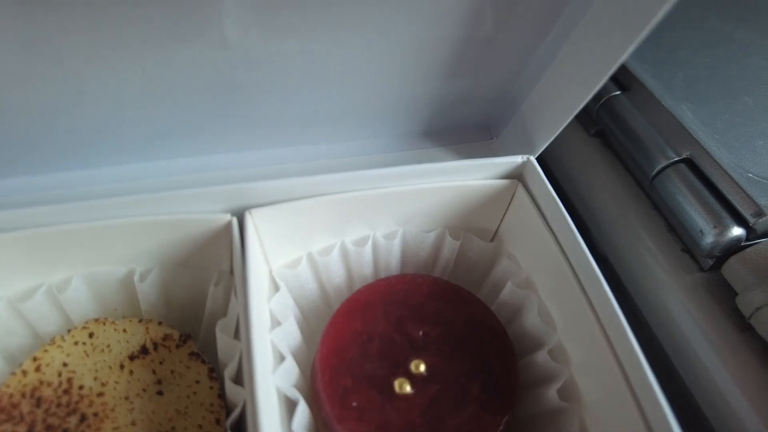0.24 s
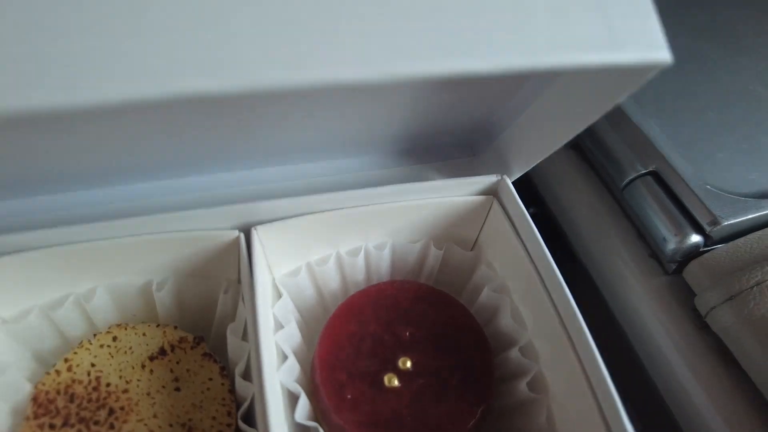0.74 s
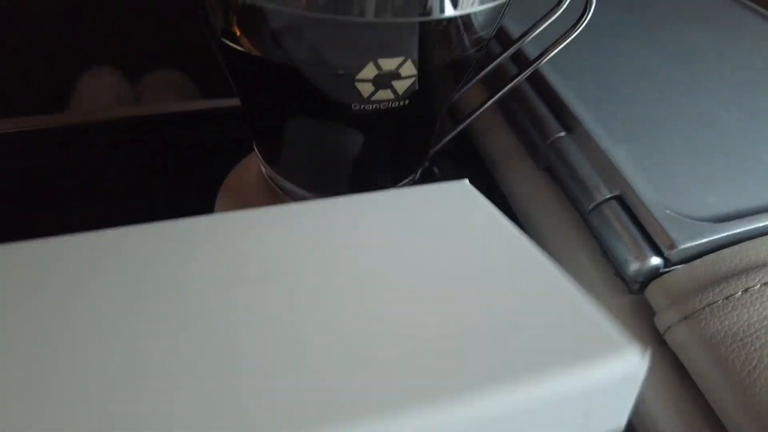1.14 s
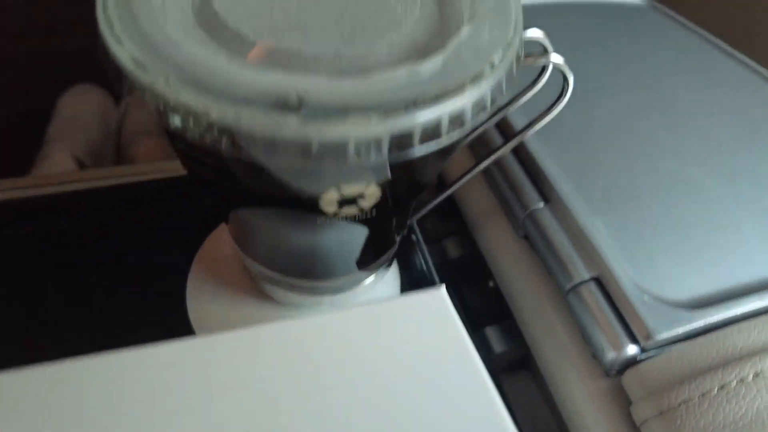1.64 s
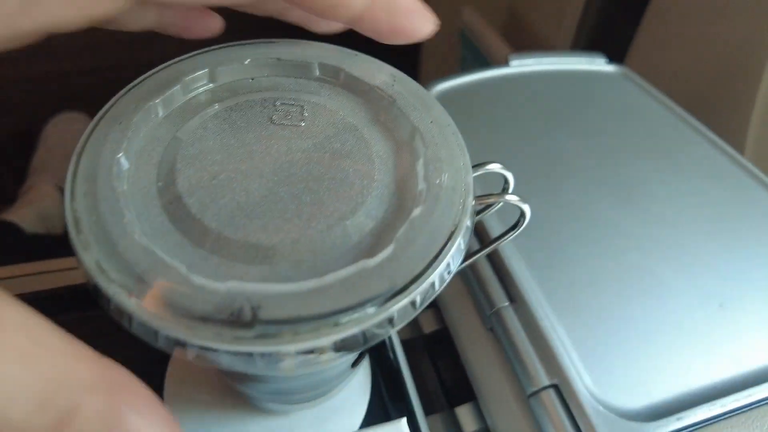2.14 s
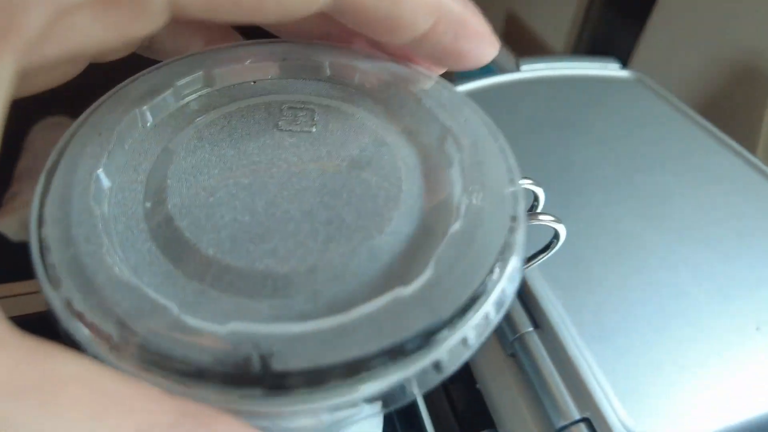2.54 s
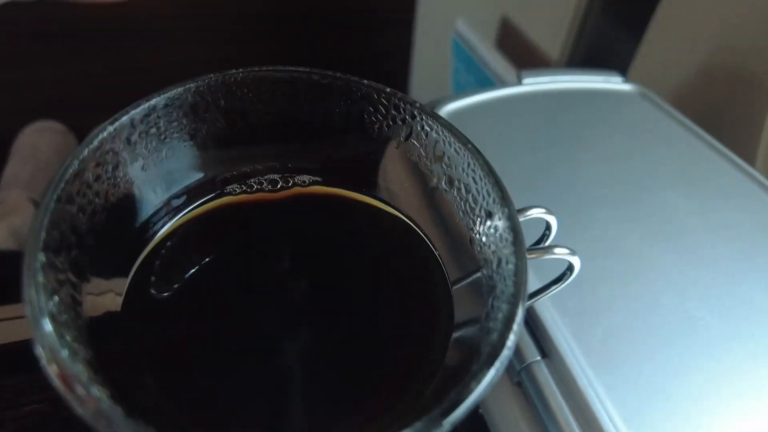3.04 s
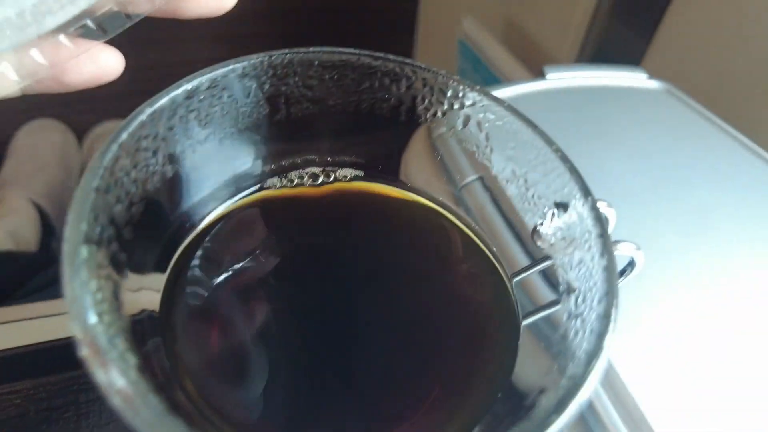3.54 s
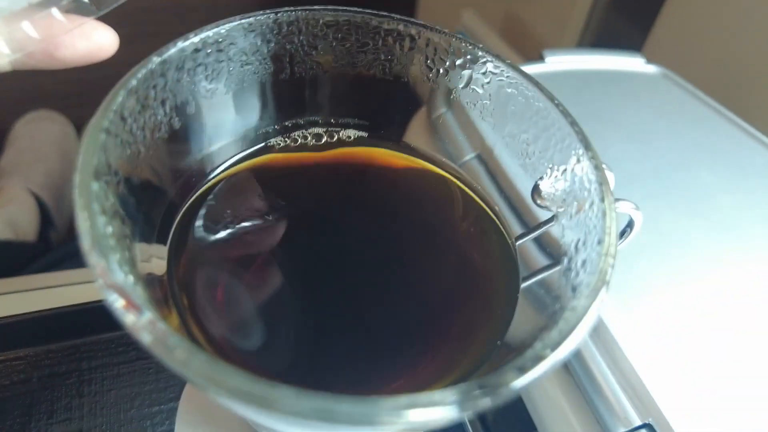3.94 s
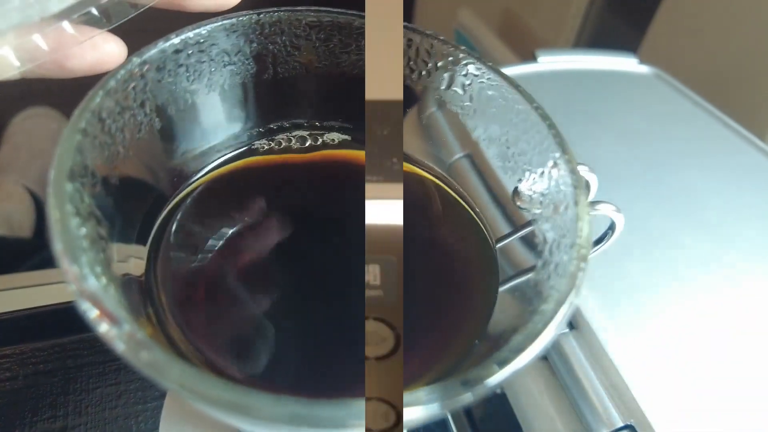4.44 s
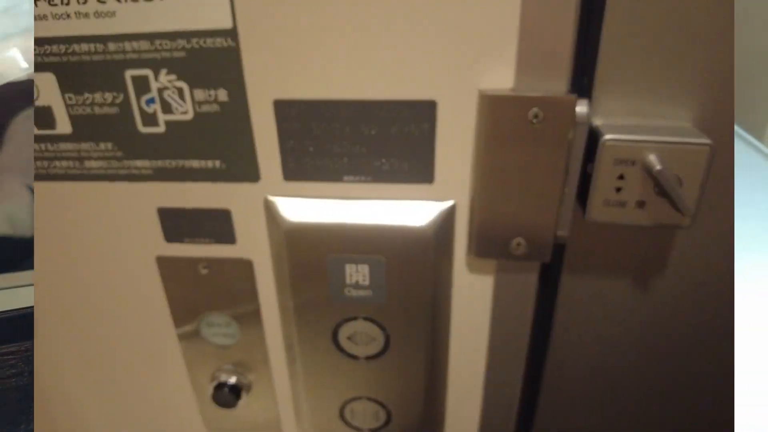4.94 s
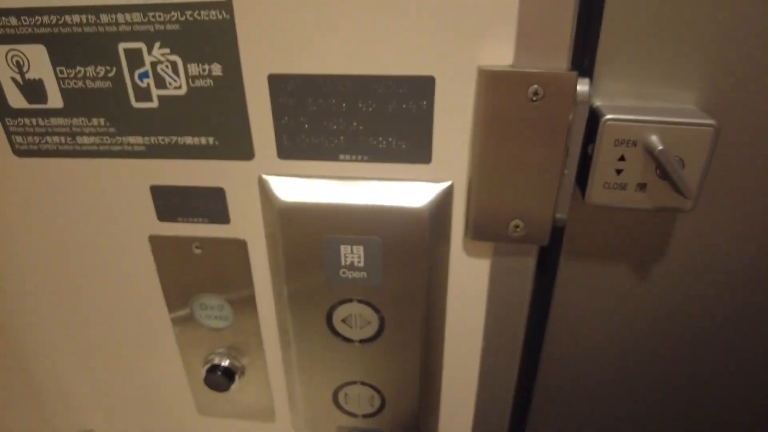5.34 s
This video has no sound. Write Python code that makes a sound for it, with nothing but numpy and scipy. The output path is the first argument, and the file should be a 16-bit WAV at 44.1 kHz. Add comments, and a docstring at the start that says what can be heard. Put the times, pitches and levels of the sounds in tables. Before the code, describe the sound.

Inside a smoothly running fast train, a deep bass-heavy rumble holds steady, with a wavering low boom, a slightly higher drone slowly building, soft rushing air and a barely audible thin vent whistle. Close to the microphone, at about 0.15 and 0.24 s, a card box gives small papery knocks, with a soft rub near 0.5 s. From 1.04 to 1.54 s its lid closes, a faint breathy hollow falling in pitch, ending in a tiny tap. The rumble eases slightly until 2.7 s. Fingers rustle; at 2.19 s they grip the cup with a dull hollow knock, and small crackles follow to 2.7 s. Plastic clicks lightly on glass around 3.67, 4.18 and, more crisply, 4.62 s. The rumble sinks, then at 4.76 s cuts abruptly to a louder vestibule: heavy roar growing for half a second, rolling floor booms, machinery hum, hissing air and faint whine, continuing to the end.

```python
"""A fast train from inside: shaped noise for wheel rumble and rushing air, wavering tones for body booms.
At the seat a card cake box is closed and the plastic lid is lifted off a glass of coffee: noise bursts
for taps and bumps, decaying modes for knocks, filtered noise for rubs, puffs and rustle, ringing hollows.
Then, abruptly, the vestibule by a door: louder running noise with machinery hum and bands of whine."""
import sys
import numpy as np
from scipy import signal
from scipy.fft import rfft, irfft, next_fast_len
from scipy.io import wavfile
from scipy.ndimage import uniform_filter1d, minimum_filter1d

SR = 44100
rng = np.random.default_rng(int(sys.argv[2]) if len(sys.argv) > 2 else 0)


def to_wav(s):
    """Save 16-bit WAV."""
    ch = np.atleast_2d(s).T  # columns
    pcm = np.round(np.clip(ch, -1, 1) * 32767)  # PCM
    wavfile.write(sys.argv[1], SR, pcm.astype(np.int16))


N = 247401

TIME = np.arange(N) / SR  # s
SIZE = next_fast_len(N, real=True)
HZ = np.maximum(np.fft.rfftfreq(SIZE, 1 / SR), 1)
BURST = np.arange(SR // 4) / SR  # time within one blow, s
BURST_HZ = np.maximum(np.fft.rfftfreq(len(BURST), 1 / SR), 1)
SIDES = np.array([[1], [-1]])  # left, right

# Running noise at the seat, low and high part: (frequency [Hz], level per Hz [dB])
SEAT_RUMBLE_SHAPE = [(8.8, -44.5), (15, -11), (27, 0.5), (43, -7), (54, -3.5), (70, -7), (97, -10.5),
                     (125, -11), (158, -14), (179, -27.5), (237, -23), (331, -32), (420, -40), (550, -68.5),
                     (920, -120)]
SEAT_AIR_SHAPE = [(250, -23.5), (380, -1.5), (460, 0), (540, 0.5), (660, -6), (780, -10), (920, -10),
                  (1160, -16.5), (1300, -10), (1550, -16), (1850, -20), (2400, -27.5), (2850, -28),
                  (7000, -48.5)]
# Running noise in the vestibule, low and high part: (frequency [Hz], level per Hz [dB])
DOOR_RUMBLE_SHAPE = [(8.8, -40.5), (15, -0.5), (38, -6), (60, 0.5), (75, -5), (89, -6.5), (118, -13),
                     (185, -14.5), (201, -15.5), (227, -24), (309, -21), (420, -40.5), (550, -47.5),
                     (920, -120)]
DOOR_AIR_SHAPE = [(250, -33), (380, -3), (490, -5), (680, -10), (830, -9.5), (1030, -18), (1330, -16.5),
                  (2050, -23.5), (2460, -30), (3500, -32), (4200, -41), (5000, -48), (7500, -57),
                  (11500, -74.5)]
# Stereo width, side against mid: (frequency [Hz], level [dB])
SEAT_WIDTH = [(25, -31), (75, -31.5), (130, -19), (250, -9), (450, -5.5), (800, 4), (1050, 5.5),
              (1500, -10), (3000, 1.5), (12000, 4)]
DOOR_WIDTH = [(25, -19.5), (70, -36), (120, -25.5), (190, -11.5), (330, -6), (600, -3), (900, 6),
              (1400, -8.5), (3000, 2), (9000, 4)]
# Stereo balance, left minus right: (frequency [Hz], level [dB])
SEAT_LEAN = [(60, -2), (96, 0), (150, 0.5), (240, 1), (390, 1), (620, 1.5), (990, 3), (1580, -0.5),
             (2520, 0), (4020, -1)]
DOOR_LEAN = [(60, -2), (96, 0.5), (150, -1), (240, 2), (390, -0.5), (620, 2.5), (990, 2.5), (1580, -0.5),
             (2520, 1), (4020, -0.5)]
# Wavering drones of the cabin panels: (frequency [Hz], starting level [dB])
PANEL_DRONES = [(242, -44.5), (302, -51)]
# Swells of the vent whistle: (start [s], length [s], added level [dB])
WHISTLE_SWELLS = [(0.335, 0.21, -66), (0.92, 0.23, -66.5), (2.018, 0.34, -71), (3.546, 1, -71)]
# Machinery hum in the vestibule: (frequency [Hz], level [dB])
HUM_LINES = [(172, -41), (193, -38), (275, -45.5), (312, -46), (361, -43.5), (408, -52.5), (458, -48),
             (531, -54.5), (576, -52.5), (626, -56), (690, -57.5), (796, -54.5), (945, -61.5), (1368, -64),
             (1535, -65), (1976, -60), (2915, -65), (2937, -64.5), (3036, -65.5), (3061, -63),
             (3105, -62.5), (3801, -73)]
# Narrow bands of whine in the vestibule: (centre [Hz], width [Hz], level [dB])
WHINE_BANDS = [(2990, 300, -51.5), (3950, 340, -60), (5980, 590, -72.5), (9250, 420, -86),
               (10600, 120, -86)]
# Surges of the floor boom in the vestibule: (start [s], length [s], level [dB])
FLOOR_SURGES = [(4.789, 0.088, -17.5), (4.925, 0.11, -17.5), (5.028, 0.077, -12), (5.125, 0.058, -11),
                (5.246, 0.19, -16), (5.567, 0.084, -18.5)]
# Taps and creases of card and plastic:
# (time [s], starting level [dB], centre [Hz], 60 dB decay [s], treble level [dB])
TAP_EVENTS = [(0.153, -54, 2400, 0.12, -42), (0.237, -57, 3000, 0.14, -25), (0.538, -64, 3500, 0.12, -22.5),
              (.66, -65, 4500, .07, -8), (.745, -71, 4500, .07, -18), (.919, -60.5, 6930, 0.046, 11),
              (1.357, -65, 9000, 0.15, -3), (1.515, -45.5, 2800, 0.01, 6), (1.641, -61.5, 4590, 0.21, -7),
              (2.074, -54.5, 3030, 0.11, -19), (2.125, -63, 3800, 0.11, -11),
              (2.192, -61.5, 2900, 0.19, -29), (2.333, -68, 7000, .07, -10), (2.413, -56, 4000, 0.026, -33),
              (2.415, -65, 6900, .025, -30), (2.588, -59.5, 7000, 0.14, -24), (2.593, -53, 1970, 0.1, -25),
              (2.621, -61, 2100, 0.045, -17), (2.687, -57, 1590, 0.1, -35), (3.082, -63, 3000, .046, -23),
              (3.257, -66.5, 10900, 0.32, -8), (3.478, -59.5, 1900, 0.2, -14),
              (3.735, -67, 6500, 0.049, -20), (4.352, -59, 4050, 0.023, -5.5),
              (4.483, -62, 4000, 0.014, -19), (4.596, -61, 4500, .01, -10), (4.616, -54, 5000, 0.025, -24),
              (4.625, -62, 9000, .02, -3), (4.636, -47, 7500, 0.012, 5), (4.641, -60, 9000, .01, 5),
              (4.659, -50.5, 3700, 0.011, -12), (4.707, -60.5, 13000, 0.044, -16)]
# Dull bumps on the box and the tray table: (time [s], starting level [dB], centre [Hz], 60 dB decay [s])
BUMP_EVENTS = [(.238, -45.5, 400, 0.22), (1.514, -47, 1250, 0.027), (2.076, -55, 750, .06),
               (2.187, -44, 420, 0.22), (2.192, -54, 1200, .15), (2.48, -52, 850, 0.086),
               (3.675, -47, 560, 0.18), (4.636, -49.5, 1000, 0.027)]
# The plastic lid knocks on the glass: (time [s], level [dB])
LID_KNOCKS = [(3.661, -50.5), (3.682, -53), (4.104, -56), (4.179, -43.5), (4.312, -53.5), (4.617, -42)]
# Ringing modes of lid on glass: (frequency [Hz], level [dB], 60 dB decay [s])
LID_RING = [(1070, -6.5, 0.15), (1830, 0.5, 0.036), (1900, -10.5, 0.028), (2700, -18.5, 0.039),
            (3200, -19.5, 0.05), (4400, -15.5, 0.034), (5300, -14.5, 0.014)]
# The fingers take hold of the cup: (time [s], level [dB])
CUP_GRASPS = [(2.187, -36.5), (2.193, -50)]
# Ringing modes of the cup on its tray: (frequency [Hz], level [dB], 60 dB decay [s])
CUP_RING = [(314, 0, 0.11), (388, 6.5, 0.07), (586, -7, 0.11), (710, -12, 0.048), (870, -11, 0.21),
            (1370, -14, 0.12)]
# The card box is knocked as its lid is taken hold of: (time [s], starting level [dB], 60 dB decay [s])
BOX_HITS = [(.153, -49.5, .05), (0.159, -48, 0.13), (0.241, -47.5, 0.11)]
# Resonances of the card walls: (centre [Hz], width [Hz], level [dB])
CARD_WALLS = [(860, 120, 6), (1020, 90, 12), (1250, 200, -2), (1520, 160, 2), (1990, 150, -11),
              (2450, 180, -21), (3160, 260, -21)]
# Soft rubs and puffs of air around the box, lid and cup: (start [s], length [s], level [dB], centre [Hz])
RUBS_AND_PUFFS = [(0, 0.1, -51, 730), (0, .1, -49, 415), (0.502, 0.073, -44, 494), (0.542, 0.19, -53, 660),
                  (0.72, 0.15, -68, 1700), (1.06, 0.28, -68.5, 1900), (1.11, 0.25, -70.5, 2880),
                  (2.597, 0.14, -69.5, 6100), (3.456, .11, -50.5, 700), (3.626, 0.096, -51, 530),
                  (3.973, 0.19, -53, 560)]
# Edges of card or plastic scrape: (start [s], length [s], level [dB], centre [Hz], width [Hz])
EDGE_SCRAPES = [(0.144, 0.021, -58, 2600, 2200), (0.233, 0.02, -60, 4770, 5000),
                (2.573, .045, -64, 5800, 2000), (2.652, 0.044, -70, 5760, 2220)]
# The hand covers the cup and its air rings: (start [s], length [s], level [dB], note [Hz])
CUPPED_AIR = [(1.75, 0.56, -63, 928), (2.37, 0.26, -57, 980), (2.66, 0.18, -58, 870),
              (2.782, 0.2, -62, 950), (3.08, 1.05, -60, 980), (3.841, 0.48, -59.5, 919)]
# Fingertips stroke card or plastic: (start [s], length [s], level [dB])
FINGER_STROKES = [(0, 0.28, -74), (0.218, 0.24, -73.5), (0.58, 0.23, -75), (0.89, 0.095, -71),
                  (1.02, 0.35, -69.5), (1.404, 0.19, -67.5), (1.616, 0.31, -73.5), (1.926, 0.31, -69),
                  (2.317, 0.19, -75.5), (2.885, 0.11, -70.5), (3.03, .12, -73.5), (3.21, 0.22, -75),
                  (3.446, 0.2, -74.5), (3.672, 0.14, -76.5), (3.925, 0.075, -78), (4.342, 0.14, -83.5),
                  (4.6, 0.089, -73)]
# Colour of the fingertip hiss and the faint hiss under it: (frequency [Hz], level [dB])
RUSTLE_SHAPE = [(700, -21.0), (1800, 0), (4700, -0.5), (6500, -4.0),
                (8000, -3.5), (11500, -14), (13400, -7.0), (15500, -7.0)]

LEAVE_S, ARRIVE_S = 4.751, 4.761  # end of the seat, start of the vestibule
SEAT_RUMBLE_DB, SEAT_AIR_DB = -24, -54
LOW_BOOM_DB = -26.5
UPPER_BOOM_DB, UPPER_BOOM_RISE_DB, UPPER_BOOM_RISE_S = -32, 5.5, 4.6  # builds up to its level
PANEL_FADE_DB_PER_S = 1.95  # the drones slowly die down
VENT_DB, VENT_RUSH_DB = -72.5, -16.5  # steady whistle, and its noise against the pure note
LULL_S, LULL_LENGTH_S, LULL_DB = 1.07, 1.64, -1.26  # the track runs smoother for a moment
SINK_S, SINK_DB_PER_S = 4.525, 23.5  # the running noise sinks just before the seat is left
DOOR_RUMBLE_DB, DOOR_AIR_DB = -15, -38  # full level in the vestibule
DOOR_RISE_DB, DOOR_RISE_S = 4.5, 0.54  # the noise there grows at first, then holds
BOX_START_S, BOX_CLOSE_S, BOX_DB = 1.04, 0.5, -55.5  # the box lid comes down and the air inside rings
BOX_OPEN_HZ, BOX_SHUT_HZ, BOX_GLIDE_POWER = 1383, 585, 1.25  # falls ever faster as the gap closes
BOX_PUFF_S, BOX_PUFF_LENGTH_S, BOX_PUFF_DB = 1.235, 0.086, 2.5  # a brief stronger puff of squeezed air
BOX_UPPER_RATIO, BOX_UPPER_DB, BOX_UPPER_SHARE = 1.27, -61, 0.72  # second resonance, ends early
STROKE_RISE, STROKE_FALL = 0.17, 0.35  # shares of a movement spent speeding up and slowing down
HISS_FLOOR_DB = -74.5  # constant faint high hiss of the cabin air under the strokes
CRINKLES_PER_S, CRINKLE_DB, CRINKLE_SPREAD_DB = 14, 3.5, 5  # tiny creases, against the hiss
CRINKLE_HZ, CRINKLE_S = 8000, 0.0021  # their centre and decay time
SLIPS_PER_S = 1300  # how often a scraping edge slips
CEILING_DB, LIMIT_S = -3.7, 0.03  # limiter ceiling and smoothing time
TOP_HZ = 15800


def undb(db):
    """Decibels to gain."""
    return np.exp(np.asarray(db) * (np.log(10) / 20))


def unit(x):
    """Scale to rms 1."""
    return x / np.sqrt(np.mean(x ** 2))


def spectrum(points):
    """Gain at every frequency, drawn through (frequency [Hz], level [dB]) points."""
    hz, db = np.transpose(points)
    return undb(np.interp(np.log(HZ), np.log(hz), db))


def resonance(hz, width_hz, at=HZ):
    """Response of a damped resonator, gain 1 at its centre."""
    return 1 / (1 + 1j * (at ** 2 - hz ** 2) / (at * width_hz))


def colour(x, response):
    """Filter by a frequency response."""
    return irfft(rfft(x, SIZE) * response, SIZE)[..., :N]


def walk(rate):
    """Smooth random drift of spread about 1, changing about rate times a second."""
    knots = rng.standard_normal(N // 16)
    return 1.248 * np.interp(2 * rate * TIME, np.arange(len(knots)), knots)


def near_noise(width):
    """Noise from close by: partly alike at both ears."""
    mid, apart = rng.standard_normal((2, N))
    return mid + width * SIDES * apart


def stereo_noise(shape, side, balance):
    """Coloured noise in stereo, with a mid of rms 1."""
    mid, apart = rng.standard_normal((2, N))
    pair = mid + SIDES * colour(apart, spectrum(side))
    pair = colour(pair, shape * spectrum(balance) ** (SIDES / 2))
    return pair / np.std(pair.mean(axis=0))


def steady(x, window_s, share):
    """Even out a share of the slow swells of a noise."""
    power = uniform_filter1d(x.mean(axis=0) ** 2, int(window_s * SR))
    return x / (power + 1e-9) ** (share / 2)


def waver(x, lowest_hz, depth_db):
    """Turbulence: each of eight half-octave bands swells and sinks on its own."""
    bands = np.eye(8)  # each row opens one band
    centres = np.log(lowest_hz) + np.arange(len(bands)) * np.log(2) / 2
    whole, log_hz = rfft(x, SIZE), np.log(HZ)
    out = 0
    for band in bands:
        part = irfft(whole * np.interp(log_hz, centres, band), SIZE)[:, :N]
        out = out + part * undb(depth_db * walk(rate=6))
    return out


def tone(hz, wander_hz, rate, flutter_db):
    """A sine of rms 1 that wavers in pitch and level."""
    phase = 2 * np.pi * np.cumsum(hz + wander_hz * walk(rate)) / SR
    sine = np.sin(phase + rng.uniform(0, 2 * np.pi))
    return unit(sine * undb(flutter_db * walk(rate)))


def stroke(s, length):
    """A smooth movement from 0 to 1 and back: it speeds up, holds and slows to rest."""
    done = (TIME - s) / length
    return np.clip(np.minimum(done / STROKE_RISE, (1 - done) / STROKE_FALL), 0, 1)


def build_up(s, rise_s, rise_db):
    """A level in dB that climbs evenly to 0 and stays there."""
    return -rise_db * np.clip(1 - (TIME - s) / rise_s, 0, 1)


def fade(t60):
    """A quick rise, then exponential decay; longer sounds begin more softly."""
    age = BURST / t60
    return (1 - np.exp(-age / 0.003)) * np.exp(-np.log(1000) * age)


def burst(shape, t60, crackle_db):
    """The crackle of one contact, rung through a response; about rms 1 at its start."""
    size = len(BURST)
    mid, apart = rng.standard_normal((2, size))
    # the level jumps every 32 samples
    crackle = undb(crackle_db * np.repeat(rng.standard_normal(size), 32)[:size])
    push = (mid + 0.6 * SIDES * apart) * crackle * fade(t60)
    return irfft(rfft(push) * shape, size) / np.sqrt(np.mean(abs(shape) ** 2))


def ringing(modes):
    """One blow on an object: its modes sound together, each decaying at its own pace."""
    return sum(np.sin(2 * np.pi * hz * BURST) * fade(t60) * undb(db) for hz, db, t60 in modes)


def add(out, s, sound):
    """Mix a short sound in at a given time."""
    start = int(s * SR)
    out[:, start:start + len(BURST)] += sound


def crinkles():
    """Tiny creases snap at random moments, a few much stronger than the rest."""
    strengths = undb(CRINKLE_SPREAD_DB * rng.standard_normal(N))
    snaps = (rng.random(N) < CRINKLES_PER_S / SR) * strengths
    dying = signal.lfilter([1], [1, -np.exp(-1 / (CRINKLE_S * SR))], snaps)
    crackle = unit(colour(near_noise(width=0.67), resonance(CRINKLE_HZ, CRINKLE_HZ)))
    return crackle * dying * undb(CRINKLE_DB)


def rustle():
    """Skin slips over card and plastic in a grainy, catching hiss, above a faint hiss of the cabin air."""
    strokes = sum(stroke(s, length) * undb(db) for s, length, db in FINGER_STROKES)
    catches = undb(2 * walk(14))
    grains = near_noise(width=0.8) * undb(1.5 * walk(250))
    hiss = unit(colour(grains, spectrum(RUSTLE_SHAPE)) * catches)
    return (hiss + crinkles()) * (undb(HISS_FLOOR_DB) + strokes)


def rubs():
    """Soft rubs and puffs of air: filtered noise that starts quickly and dies away."""
    noise = near_noise(width=0.6) * undb(1.5 * walk(120))
    out = 0
    for s, length, db, hz in RUBS_AND_PUFFS:
        swell = np.interp((TIME - s) / length, [0, 0.08, 0.7, 1], [0, 1, 0.7, 0])
        band = unit(colour(noise, resonance(hz, hz * 0.36) ** 2))
        out = out + band * swell * undb(db)
    return out


def scrapes():
    """An edge sticks and slips in a dense run of tiny snaps that ring the card or plastic."""
    slips = rng.random(N) < SLIPS_PER_S / SR
    chatter = slips * near_noise(width=1.0)
    out = 0
    for s, length, db, hz, width in EDGE_SCRAPES:
        edge = unit(colour(chatter, resonance(hz, width) ** 2))
        out = out + edge * stroke(s, length) * undb(db)
    return out


def cavity(hz, width_hz):
    """A half-shut hollow rings with noise: a narrow band centred on the given note."""
    ring = colour(near_noise(width=0.91), 1 / (1 + (HZ / width_hz) ** 2))
    carrier = np.cos(2 * np.pi * np.cumsum(hz * np.ones(N)) / SR)
    return unit(ring * carrier * undb(2 * walk(25)))


def hollows():
    """The air in the box falls in pitch as its lid closes; the cup rings whenever the hand covers it."""
    closed = np.clip((TIME - BOX_START_S) / BOX_CLOSE_S, 0, 1)
    note = BOX_OPEN_HZ + (BOX_SHUT_HZ - BOX_OPEN_HZ) * closed ** BOX_GLIDE_POWER
    puff = undb(BOX_PUFF_DB * stroke(BOX_PUFF_S, BOX_PUFF_LENGTH_S))
    outflow = stroke(BOX_START_S, BOX_CLOSE_S) * puff
    lower = cavity(note, width_hz=120) * outflow * undb(BOX_DB)
    early_flow = stroke(BOX_START_S, BOX_CLOSE_S * BOX_UPPER_SHARE)
    upper = cavity(note * BOX_UPPER_RATIO, width_hz=170) * early_flow * undb(BOX_UPPER_DB)
    cup = sum(cavity(hz, width_hz=77) * stroke(s, length) * undb(db) for s, length, db, hz in CUPPED_AIR)
    return lower + upper + cup


def taps():
    """Each tap is a burst of crackle in one broad resonance, with a crisp top."""
    out = np.zeros((2, N))
    crisp = resonance(11000, 11000, BURST_HZ)
    for s, db, hz, t60, treble_db in TAP_EVENTS:
        # a yielding contact dulls what lies far above the resonance
        soft = 1 / (1 + (BURST_HZ / (8.6 * hz)) ** 2)
        shape = resonance(hz, hz * 0.33, BURST_HZ) * soft + undb(treble_db) * crisp
        add(out, s, burst(shape, t60, crackle_db=1.5) * undb(db))
    return out


def bumps():
    """Soft blows set the box and the tray table thudding in a wide, heavily damped resonance."""
    out = np.zeros((2, N))
    for s, db, hz, t60 in BUMP_EVENTS:
        shape = resonance(hz, hz * 1.05, BURST_HZ) ** 2
        add(out, s, burst(shape, t60, crackle_db=3.5) * undb(db))
    return out


def box_knocks():
    """Card edges catch in a short crunch, and the walls of the box answer with a papery, hollow ring."""
    walls = sum(resonance(hz, width, BURST_HZ) * undb(db) for hz, width, db in CARD_WALLS)
    out = np.zeros((2, N))
    for s, db, t60 in BOX_HITS:
        add(out, s, burst(walls, t60, crackle_db=0.5) * undb(db))
    return out


def grasp():
    """Thumb and finger land on the lid; cup and tray answer with a firm, hollow knock."""
    out = np.zeros((2, N))
    for s, db in CUP_GRASPS:
        add(out, s, ringing(CUP_RING) * undb(db))
    return out


def knocks():
    """The lid's rim rings briefly against the glass, with a dry scuff."""
    ring = ringing(LID_RING)
    out = np.zeros((2, N))
    for s, db in LID_KNOCKS:
        scuff = burst(resonance(1900, 700, BURST_HZ), t60=0.022, crackle_db=-3.0)
        add(out, s, (ring + scuff * undb(-16.5)) * undb(db))
    return out


def vent_whistle():
    """A thin, unsteady note with a narrow rush of air around it, swelling with the draught."""
    rush = unit(colour(near_noise(width=0.45), resonance(hz=1384, width_hz=40) ** 2))
    whistle = tone(hz=1373, wander_hz=5, rate=14, flutter_db=0.9) + rush * undb(VENT_RUSH_DB)
    draught = undb(VENT_DB) + sum(stroke(s, length) * undb(db) for s, length, db in WHISTLE_SWELLS)
    return whistle * draught


def body_booms():
    """The car body drones: a low boom, an upper boom that builds, and panel tones that die down."""
    low = tone(hz=42.02, wander_hz=1.116, rate=5, flutter_db=2.0)
    low = low * undb(LOW_BOOM_DB - SIDES * 1.0)  # 2 dB stronger on the right
    upper_db = UPPER_BOOM_DB + build_up(0, UPPER_BOOM_RISE_S, UPPER_BOOM_RISE_DB)
    upper = tone(hz=121.77, wander_hz=2.42, rate=7, flutter_db=2.0) * undb(upper_db)
    panels = 0
    for hz, db in PANEL_DRONES:
        drone = tone(hz, wander_hz=7.07, rate=6, flutter_db=3.0)
        panels = panels + drone * undb(db - PANEL_FADE_DB_PER_S * TIME)
    return low + upper + panels


def seat():
    """Evened-out wheel rumble, booms of the car body, turbulent rushing air and a thin vent whistle."""
    rumble = stereo_noise(spectrum(SEAT_RUMBLE_SHAPE), SEAT_WIDTH, SEAT_LEAN)
    rumble = steady(rumble, window_s=0.14, share=0.62)
    air = stereo_noise(spectrum(SEAT_AIR_SHAPE), SEAT_WIDTH, SEAT_LEAN)
    air = waver(air, lowest_hz=372, depth_db=2.73)
    noise = rumble * undb(SEAT_RUMBLE_DB) + air * undb(SEAT_AIR_DB)
    lull_db = LULL_DB * stroke(LULL_S, LULL_LENGTH_S)
    sink_db = SINK_DB_PER_S * np.maximum(TIME - SINK_S, 0)
    return (noise + body_booms() + vent_whistle()) * undb(lull_db - sink_db)


def floor_boom():
    """The floor over the bogie booms in rolling surges of one wavering tone."""
    effort = sum(stroke(s, length) * undb(db) for s, length, db in FLOOR_SURGES)
    return tone(hz=75.45, wander_hz=2.99, rate=12, flutter_db=1.5) * effort


def vestibule():
    """Less insulation by the door: heavier rumble, hissing air, machinery hum and bands of whine."""
    rumble = stereo_noise(spectrum(DOOR_RUMBLE_SHAPE), DOOR_WIDTH, DOOR_LEAN)
    rumble = waver(rumble, lowest_hz=71.9, depth_db=1.5)
    rumble = steady(rumble, window_s=0.12, share=0.86)
    air = stereo_noise(spectrum(DOOR_AIR_SHAPE), DOOR_WIDTH, DOOR_LEAN)
    rise_db = build_up(ARRIVE_S, DOOR_RISE_S, DOOR_RISE_DB)
    roar = (rumble * undb(DOOR_RUMBLE_DB) + air * undb(DOOR_AIR_DB)) * undb(rise_db)
    flow = near_noise(width=0.94)
    whine = sum(unit(colour(flow, resonance(hz, width) ** 2)) * undb(db) for hz, width, db in WHINE_BANDS)
    hum = sum(tone(hz, wander_hz=3.2, rate=12, flutter_db=2.5) * undb(db) for hz, db in HUM_LINES)
    # hum and whine follow the rise, centred on their average level
    swell_db = rise_db - rise_db[TIME > ARRIVE_S].mean()
    return roar + floor_boom() + hum * undb(swell_db) + whine * undb(0.72 * swell_db)


def scene():
    """The seat, an instant of silence, then the vestibule."""
    soft_sounds = rustle() + rubs() + scrapes() + hollows()
    contacts = taps() + bumps() + box_knocks() + grasp() + knocks()
    at_seat = seat() + soft_sounds + contacts
    leave = np.clip((LEAVE_S - TIME) / 0.002, 0, 1)
    arrive = np.clip((TIME - ARRIVE_S) / 0.002, 0, 1)
    return at_seat * leave + vestibule() * arrive


def record(dry):
    """The recorder eases down the highest peaks, both sides together, and cuts the top."""
    size = int(LIMIT_S * SR)
    headroom = np.minimum(undb(CEILING_DB) / (abs(dry).max(axis=0) + 1e-9), 1)
    gain = uniform_filter1d(minimum_filter1d(headroom, size), size)
    top_cut = signal.ellip(8, 0.2, 70, TOP_HZ, fs=SR, output="sos")
    return signal.sosfilt(top_cut, dry * gain)


dry = scene()
out = record(dry)
to_wav(out)
```